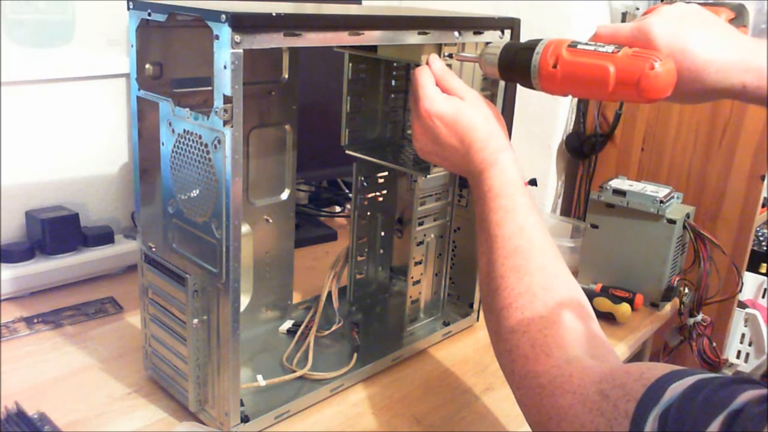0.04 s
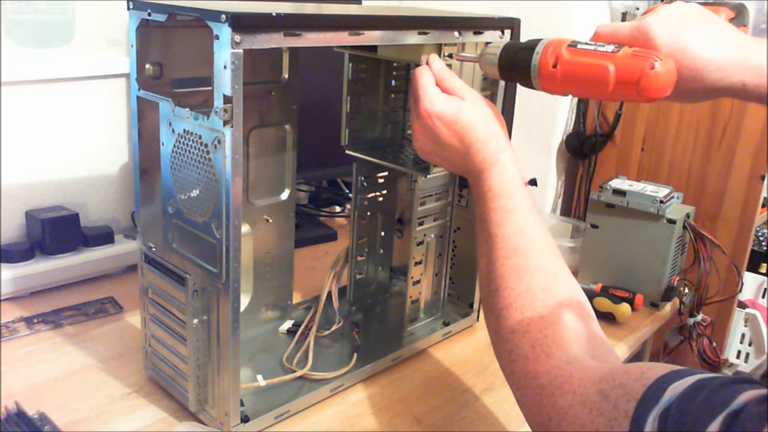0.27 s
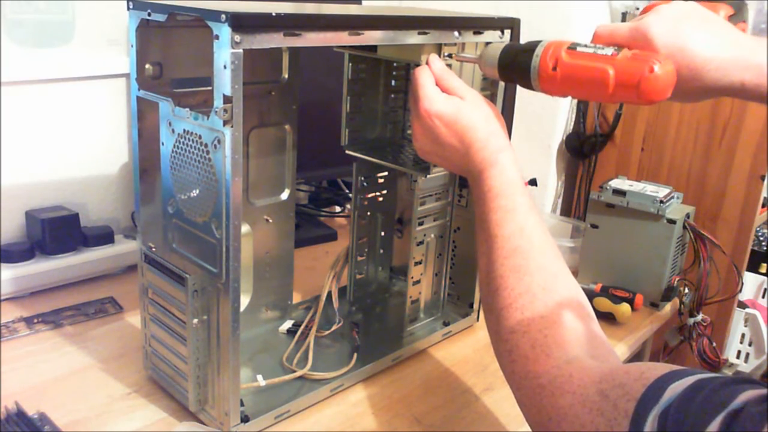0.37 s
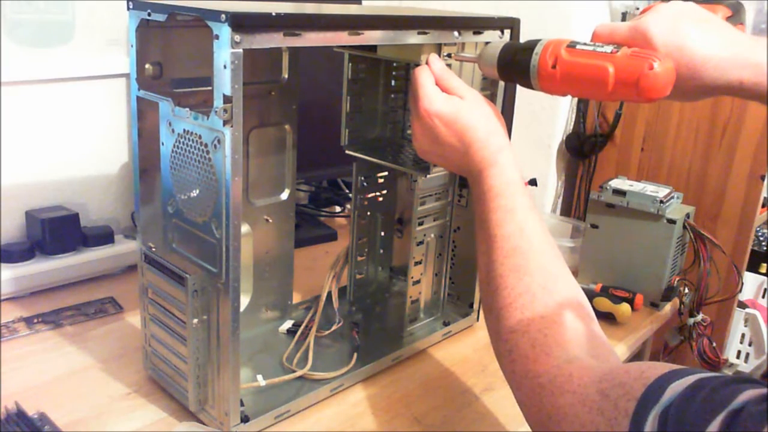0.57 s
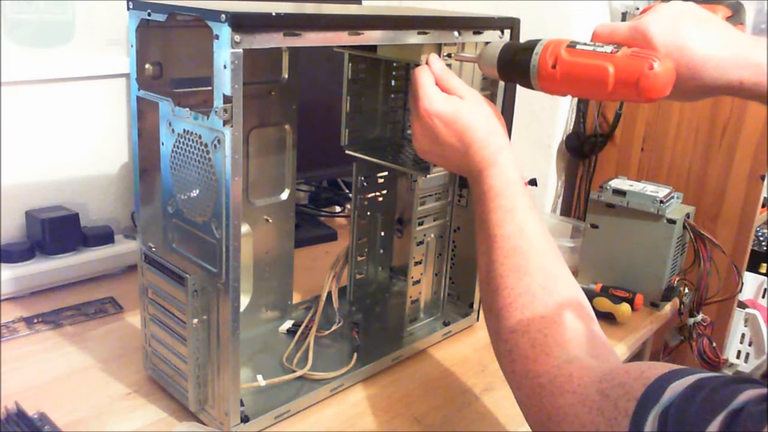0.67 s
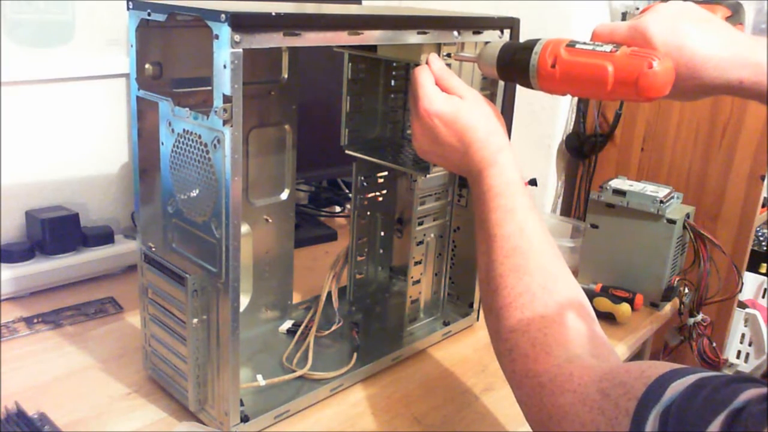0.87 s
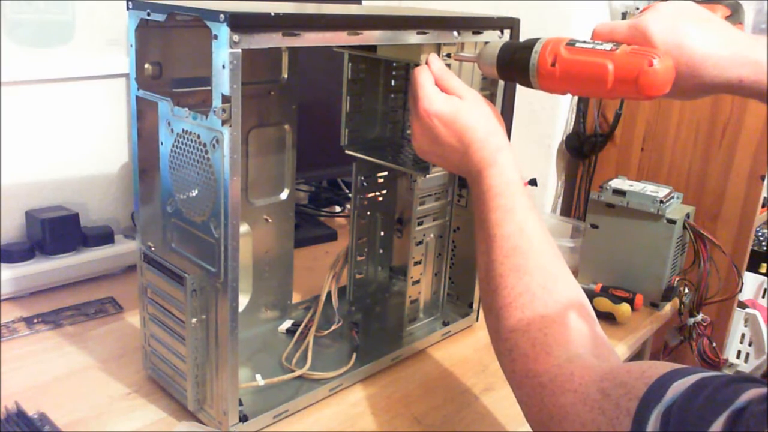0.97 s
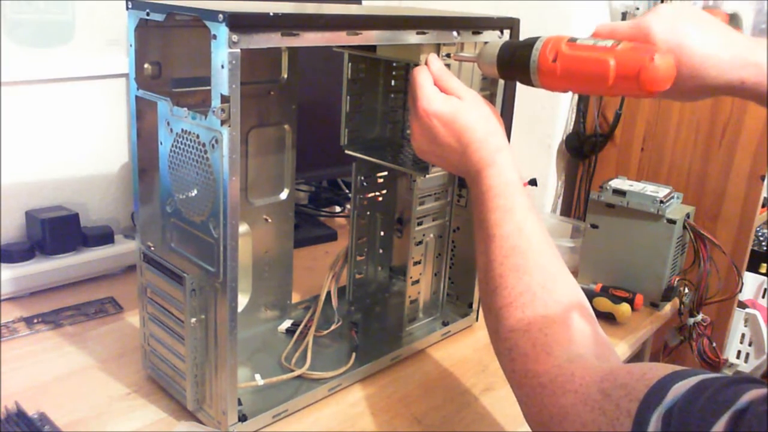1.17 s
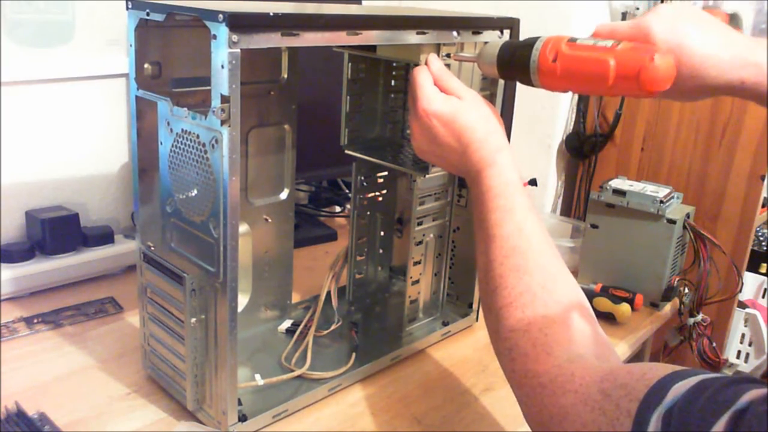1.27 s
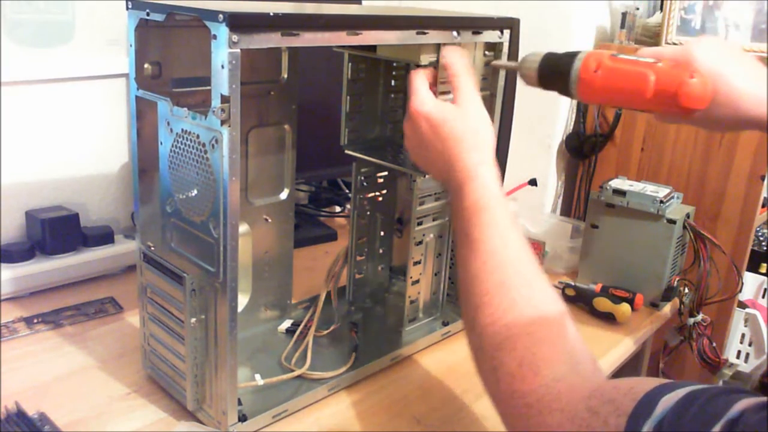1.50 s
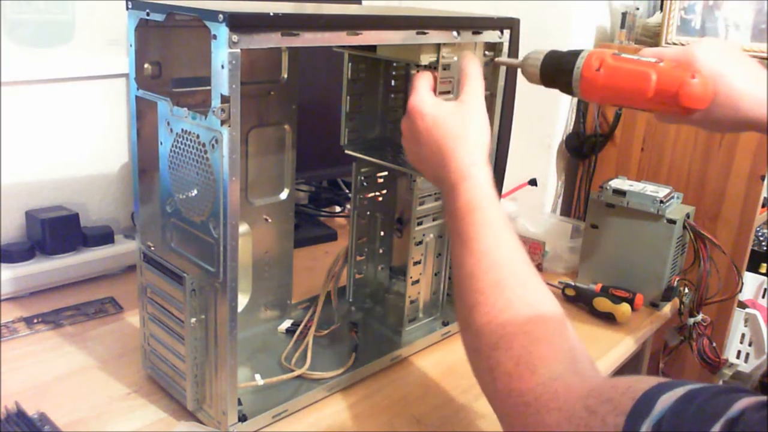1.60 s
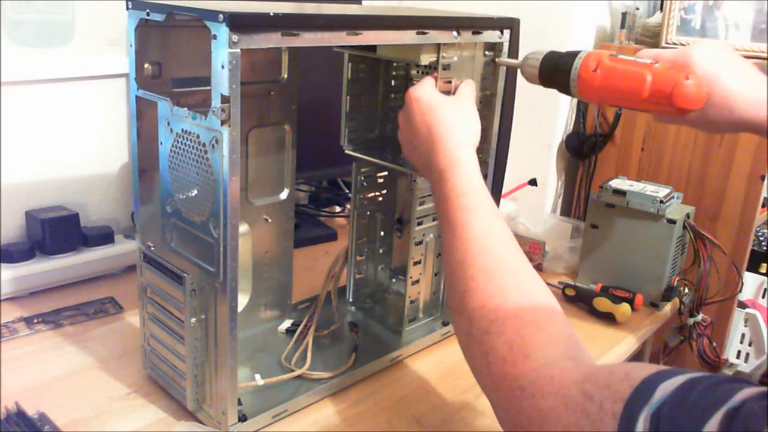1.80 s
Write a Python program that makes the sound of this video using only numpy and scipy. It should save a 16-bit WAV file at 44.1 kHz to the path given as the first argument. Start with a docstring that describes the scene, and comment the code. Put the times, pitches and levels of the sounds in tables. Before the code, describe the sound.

A cordless drill whines up to speed, then its clutch rattles hard against a sheet steel case

```python
"""A drill motor whines up to speed, then a fast clutch rattle shakes sheet steel; a clunk and a swish follow.
A cordless drill drives a screw into a steel computer case, close by in a small room.
Motor, speed control and humming panels are sines at moving rates; gears, shaking and swish are coloured noise.
Each clutch slip is a noise snap plus a blow on the ringing panels. Steady hiss and a low rumble lie beneath."""
import sys
import numpy as np
from scipy import signal
from scipy.fft import rfft, irfft, next_fast_len
from scipy.io import wavfile
from scipy.ndimage import map_coordinates

SR = 44100
rng = np.random.default_rng(int(sys.argv[2]) if len(sys.argv) > 2 else 0)


def transcribe(signal):
    """Save signal, clipped to [-1, 1], as a 16-bit WAV file at the path in sys.argv[1]."""
    frames = np.atleast_2d(signal).T
    limited = np.clip(frames, -1, 1)
    pcm = np.round(limited * 32767).astype(np.int16)
    wavfile.write(sys.argv[1], SR, pcm)


N = 81585

# The motor run from start to stop: [t/s, commutator rate f/Hz, gear hiss level/dB, brush tone level/dB]
MOTOR_RUN = [(.18, 149.8, -53, -60), (.205, 260.6, -40, -52), (.225, 418.7, -33, -55),
             (.262, 650.3, -21, -36), (.3, 832, -19.5, -34), (.325, 919, -18.5, -31),
             (.365, 953.3, -19, -27), (.43, 977.7, -18.5, -26), (.68, 975.2, -17.5, -26),
             (.745, 972.2, -17.5, -26.5), (.79, 984.2, -16.5, -24.5), (.86, 987.8, -15, -25.5),
             (1.03, 988.2, -18.5, -24.5), (1.085, 985, -14.5, -45), (1.11, 917, -21.5, -59),
             (1.15, 864, -33, -67), (1.23, 850, -56, -77.5)]


def amp(db):
    """Turn decibels into a plain multiplier."""
    return 10 ** (np.asarray(db) / 20)


def unit(x):
    """Scale a sound to an average (rms) strength of 1."""
    return x / np.sqrt(np.mean(x ** 2) + 1e-20)


def along(points, hz):
    """Read a value at any frequency between (f/Hz, value) points, on a log frequency axis."""
    f, v = np.transpose(points)
    return np.interp(np.log(hz + 1), np.log(f + 1), v)


def curves(rows):
    """Return a gate open over the table's time span, then each column as one value per sample."""
    s, *columns = np.transpose(rows)
    t = np.arange(N) / SR
    # the gate opens and closes over 4 ms
    gate = np.clip(np.minimum(t - s[0], s[-1] - t) / .004, 0, 1)
    return [gate] + [np.interp(t, s, column) for column in columns]


def wobble(rate):
    """Draw a smooth random curve through `rate` random points a second."""
    points = rng.standard_normal(int(N * rate / SR) + 4)
    return map_coordinates(points, [np.arange(N) * rate / SR])


def filtered(x, response):
    """Multiply the spectrum of x by a response that depends on frequency."""
    m = next_fast_len(N + SR // 2)
    hz = np.fft.rfftfreq(m, 1 / SR)
    return irfft(rfft(x, m) * response(hz), m)[..., :N]


def hiss(spectrum):
    """Colour random noise with (f/Hz, level/dB) points and scale it to rms 1."""
    noise = rng.standard_normal(N)
    return unit(filtered(noise, lambda hz: amp(along(spectrum, hz))))


def tones(rate_hz, multiples, flutter_db):
    """Add sines at multiples of a moving rate, each with its own flutter; 0 dB is about rms 1."""
    phase = 2 * np.pi * np.cumsum(rate_hz) / SR
    total = 0
    for multiple, db in multiples:
        level = np.sqrt(2) * amp(db + flutter_db * wobble(38.97))
        total = total + level * np.sin(multiple * phase + rng.uniform(0, 6.97))
    return total


def motor():
    """Brushes hum at multiples of the commutator rate; gritty gear hiss pulses once a shaft turn."""
    # Brush tones: [multiple of the commutator rate, level/dB]
    brush_tones = [(3, -13), (4, 0), (5, -7), (6, -4), (7, -8), (8, -5), (9, -9), (10, -10), (11, -9),
                   (12, -12)]
    # Colour of the gear hiss: [f/Hz, level/dB]
    gear_colour = [(530, -13), (900, -3.5), (1960, 5), (3150, 2), (4150, 2.5), (7350, 0.5), (11400, 3),
                   (15600, -20.5)]
    segments = 3  # commutator segments passed in one shaft turn
    turn_depth, grit_db = 0.044, 1
    steady_waver, spin_blur, full_rate_hz = 0.00117, .12, 985

    gate, rate_hz, hiss_db, tone_db = curves(MOTOR_RUN)
    turn = 2 * np.pi * np.cumsum(rate_hz / segments) / SR
    pulse = 1 + turn_depth * np.sin(turn)
    grit = amp(grit_db * wobble(700) + 0.33 * wobble(30.66))
    gears = unit(hiss(gear_colour) * pulse * grit)

    # the pitch is more blurred the further the motor is from full speed
    blur = steady_waver + spin_blur * np.clip(.98 - rate_hz / full_rate_hz, 0, 1)
    brush = tones(rate_hz * (1 + blur * wobble(89.96)), brush_tones, flutter_db=2)
    return gate * (amp(hiss_db) * gears + amp(tone_db) * brush)


def control():
    """The speed control's switching whine climbs roughly as the trigger is squeezed; overtones fade early."""
    # Switching whine: [t/s, switching rate f/Hz, level/dB]
    switching = [(.163, 3930, -44.5), (.184, 4170, -41), (.205, 4730, -35.5), (.222, 4830, -33.5),
                 (.25, 4940, -45)]
    # The whine and a side tone: [multiple of the switching rate, level/dB]
    main_tones = [(1, 0), (1.1, -7)]
    # Overtones before their fade: [multiple of the switching rate, level/dB]
    overtones = [(2, -4), (3, -14)]
    blur, fade_db_per_s = .032, 400

    gate, rate_hz, db = curves(switching)
    rate_hz = rate_hz * (1 + blur * wobble(1100))
    since_start = np.clip(np.arange(N) / SR - switching[0][0], 0, 1)
    fade = amp(-fade_db_per_s * since_start)
    whine = tones(rate_hz, main_tones, flutter_db=1.5)
    whine = whine + fade * tones(rate_hz, overtones, flutter_db=1.5)
    return gate * amp(db + 4.5 * wobble(300)) * whine


def growl():
    """While the motor pulls up, the gears growl as noise and the slot hum climbs with the speed."""
    # Growl as the motor pulls up: [t/s, rough noise level/dB, slot hum level/dB]
    pull_up = [(.201, -55, -63), (.208, -28, -55), (.235, -31, -50), (.26, -30, -31), (.3, -29.5, -29),
               (.33, -31, -33), (.37, -44.5, -40)]
    # Colour of the rough noise: [f/Hz, level/dB]
    rough_colour = [(400, -39), (580, -3), (800, -2), (1050, 0), (1250, -7.5), (2000, -49.5)]
    hum_blur = .07

    gate, rough_db, hum_db = curves(pull_up)
    rough = amp(rough_db + 2.3 * wobble(90)) * hiss(rough_colour)
    hum_hz = curves(MOTOR_RUN)[1] * (1 + hum_blur * wobble(119.8))
    hum = amp(hum_db) * tones(hum_hz, [(0.98, 0.0042)], flutter_db=5.0)
    return gate * (rough + hum)


def steel(f):
    """The case panels answer most strongly at their resonances; neighbours have opposite signs."""
    # Panel resonances: [centre f/Hz, width f/Hz, level/dB]
    resonances = [(83.6, 5.7, -9.5), (123, 24.5, -0.5), (154, 26, -3), (290, 32, -9), (404.3, 37, -1.5),
                  (570, 70, -4), (659, 54, -2), (844.5, 33, -2.5), (912, 28, -3), (1006, 94, -1)]
    answer = 0
    for k, (centre, width, db) in enumerate(resonances):
        peak = 1j * f * width / (centre * centre - f * f + 1j * f * width)
        answer = answer + (-1) ** k * amp(db) * peak
    return answer


def case():
    """The running drill shakes the panels through the screw: broad noise plus noise ringing in the steel."""
    # Vibration passed into the case: [t/s, level/dB]
    shaking = [(.198, -47), (.21, -40), (.286, -31), (.44, -28), (.68, -26), (.738, -23.5), (.756, -19.5),
               (.85, -18.5), (.91, -23.5), (1.0, -22), (1.09, -23), (1.13, -26), (1.2, -43.5), (1.28, -64)]
    # Colour of the broad noise: [f/Hz, level/dB]
    broad_colour = [(24, -44.5), (40, -5), (130, -1.5), (230, -2.5), (407, -4.5), (474, -6), (1500, -9.5),
                    (1950, -21), (3300, -120)]
    ring_over_broad_db = 5

    gate, db = curves(shaking)
    ring = unit(filtered(rng.standard_normal(N), steel))
    panels = unit(hiss(broad_colour) + amp(ring_over_broad_db) * ring)
    return gate * amp(db + 2.1 * wobble(24.96) + 2.47 * wobble(160)) * panels


def boom():
    """Hum at multiples of 1/24 of the commutator rate: the gear carrier hums faintly while the drill runs free,
    and the panels hum loudly once the clutch slips; upper notes flutter most."""
    # Hum of gears and panels: [t/s, low note level/dB, upper note level/dB]
    humming = [(.2, -40, -60), (.31, -37, -46), (.45, -46, -50), (.55, -38, -44), (.71, -44, -42),
               (.755, -18, -27), (.86, -18.5, -26), (.93, -29, -26), (1.04, -29, -27), (1.1, -24, -30),
               (1.17, -40, -46)]
    # Low notes: [multiple of 1/24 of the commutator rate, level/dB]
    low_notes = [(2, -10), (3, 0)]
    # Upper notes: [multiple of 1/24 of the commutator rate, level/dB]
    upper_notes = [(7, -1.5), (10, 0), (11, -5), (14, -6), (22, -6)]

    gate, low_db, upper_db = curves(humming)
    # the hum follows the motor only above a commutator rate of 900 Hz
    base_hz = np.clip(curves(MOTOR_RUN)[1], 900, None) / 24
    upper = tones(base_hz * (1 + .014 * wobble(30)), upper_notes, flutter_db=4.5)
    low = tones(base_hz, low_notes, flutter_db=1.2)
    return gate * (amp(low_db) * low + amp(upper_db) * upper)


def clutch():
    """Each slip of the clutch gives a short noise snap and a double blow that rings the case."""
    # Clutch slips: [t/s, rough snap peak level/dB, level/dB of the first blow's ringing peak]
    slips = [(0.7501, 6, -17), (0.7774, 0.5, -12), (0.7997, -0.5, -12), (0.8244, -6, -12),
             (0.8485, 2, -7.5), (0.8742, -4, -13.5), (0.8983, -8.5, -15.5), (0.9234, -15.5, -12.5),
             (0.9462, -0.5, -15), (0.9731, -5.5, -9), (0.9959, -8.5, -13.5), (1.0216, -7, -17),
             (1.0459, -7, -14.5), (1.0754, -7, -10.5)]
    # Colour of the snap: [f/Hz, level/dB]
    snap_colour = [(900, -34), (1600, -8.5), (2600, -4), (3200, -4), (4400, -0.5), (5400, -6.5), (7500, -8),
                   (10000, -5.5), (12500, -16), (15600, -26.5)]
    crest_db = 14  # noise peaks stand about this far above its rms
    hold_s, t60_s = .007, .045  # steady time, then time to fall by 60 dB

    t = np.arange(N) / SR
    snaps, blows = np.zeros(N), np.zeros(N)
    for s, snap_db, blow_db in slips:
        decay_db = 60 * np.clip(t - s - hold_s, 0, 1) / t60_s
        snaps += (t > s) * amp(snap_db - crest_db - decay_db)
        # the second, weaker blow lands 44 samples (1 ms) later, with random strength and sign
        start = round(s * SR)
        blows[start] = amp(blow_db)
        blows[start + 44] = amp(blow_db) * rng.uniform(-.6, .6)
    # peak of the ringing from a blow of size 1
    strike = np.abs(irfft(steel(np.fft.rfftfreq(SR, 1 / SR)))).max()
    return snaps * hiss(snap_colour) + filtered(blows, steel) / strike


def stop():
    """As the trigger is let go, a dull clunk of noise and one tone starts softly and dies away."""
    # Colour of the clunk: [f/Hz, level/dB]
    clunk_colour = [(450, -35), (600, -5), (745, 0), (880, -3), (1200, -30), (2500, -90)]
    start_s, start_db, tone_hz, t60_s = 1.068, -15.5, 738, 0.15

    t = np.clip(np.arange(N) / SR - start_s, 0, None)
    body = hiss(clunk_colour) + 0.44 * np.sin(2 * np.pi * tone_hz * t)
    soft_start = 1 - np.exp(-t / 0.0073)
    return amp(start_db - 60 * t / t60_s) * soft_start * body


def handling():
    """Two faint ticks of the bit mix tone and noise; a soft noise swish follows as the drill is drawn away."""
    # Swish: [t/s, level/dB]
    swish_level = [(1.38, -87), (1.43, -54.5), (1.49, -48.5), (1.555, -48.5), (1.6, -58), (1.66, -65.5),
                   (1.71, -57.5), (1.78, -72)]
    # Colour of the swish: [f/Hz, level/dB]
    swish_colour = [(1500, -17.5), (2600, -7.5), (3200, -1.5), (9000, -1), (12000, -3), (15600, -13.5)]
    # Ticks of the bit: [t/s, starting level/dB, f/Hz]
    bit_ticks = [(0.043, -47, 2130), (1.322, -52, 8500)]
    tick_t60_s = .03

    t = np.arange(N) / SR
    gate, db = curves(swish_level)
    ticks = 0
    for s, start_db, hz in bit_ticks:
        envelope = (t > s) * amp(start_db - 60 * np.abs(t - s) / tick_t60_s)
        noise = hiss([(hz / 2, -20), (hz, 0), (hz * 2, -14)])
        ticks = ticks + envelope * (np.sin(2 * np.pi * hz * t) + noise)
    return gate * amp(db + wobble(60.6)) * hiss(swish_colour) + ticks


def room(x):
    """The room's echo is a noise tail in which each frequency dies at its own speed."""
    # Time to die away by 60 dB: [f/Hz, t/s]
    decay_times = [(100, 0.52), (500, 0.46), (2000, 0.36), (10000, 0.18)]
    hz, t, z = signal.stft(rng.standard_normal(SR // 2), SR, nperseg=256)
    decay = amp(-60 * t / along(decay_times, hz)[:, None])
    tail = signal.istft(z * decay, SR, nperseg=256)[1]
    # the echo starts 200 samples late
    delayed = np.pad(x, (200, 0))
    return signal.fftconvolve(delayed, tail / np.linalg.norm(tail))[:N]


def background():
    """Steady coloured noise lies under a low room rumble whose level drifts."""
    # Colour of the steady hiss: [f/Hz, level/dB]
    floor_colour = [(12, -30), (20, -12), (35, -1.5), (64, -13.5), (274, -20), (383, -24.5), (1240, -32.5),
                    (1780, -36.5), (2160, -40), (15600, -48)]
    # Low room rumble: [t/s, level/dB]
    rumble_level = [(0, -49), (.08, -60), (1.3, -43), (1.55, -50), (1.85, -47)]
    # Colour of the rumble: [f/Hz, level/dB]
    rumble_colour = [(20, -5.5), (150, 5.5), (500, -3.5), (1500, -21), (3000, -41.5)]
    floor_db = -45.5

    floor = amp(floor_db) * hiss(floor_colour)
    rumble_db = curves(rumble_level)[1] + 2.5 * wobble(11.94)
    return floor + amp(rumble_db) * hiss(rumble_colour)


def scene():
    """Add up the drill and case, their echo in the room, and the background."""
    near = motor() + control() + growl() + case() + boom() + clutch() + stop() + handling()
    echo_db = -11.5
    return (near + amp(echo_db) * room(near) + background())[None]


def record(dry):
    """Shift the wave by a drifting offset, round off its loud peaks and cut the highest treble."""
    # Converter offset: [t/s, shift as a fraction of full scale]
    offset = [(0, -0.042), (.65, -0.052), (1.15, -0.026), (1.85, -0.027)]
    clip_top, clip_hardness, top_hz = 1.15, 4, 15752
    x = dry + curves(offset)[1]
    x = x / (1 + np.abs(x / clip_top) ** clip_hardness) ** (1 / clip_hardness)
    return filtered(x, lambda hz: hz < top_hz)


dry = scene()
out = record(dry)
transcribe(out)
```